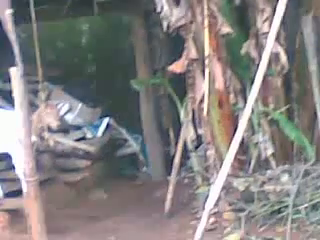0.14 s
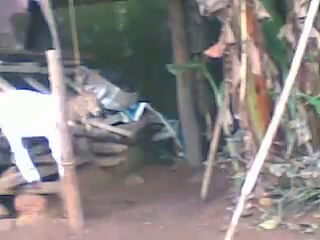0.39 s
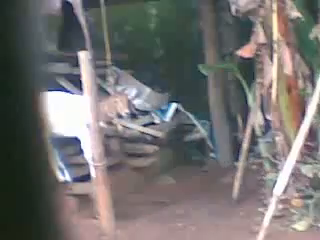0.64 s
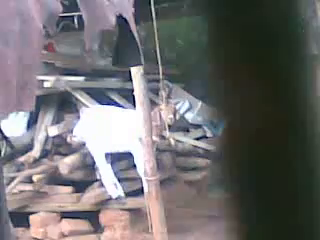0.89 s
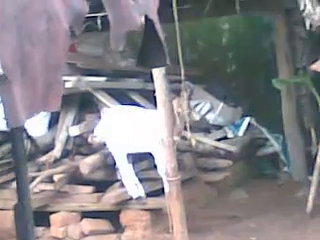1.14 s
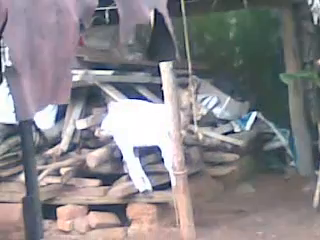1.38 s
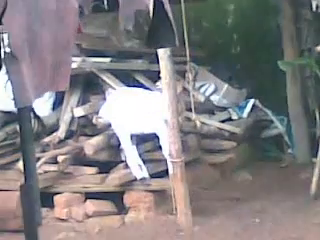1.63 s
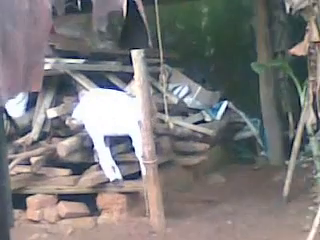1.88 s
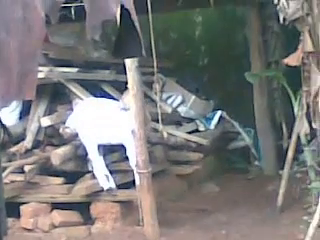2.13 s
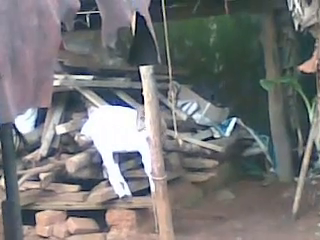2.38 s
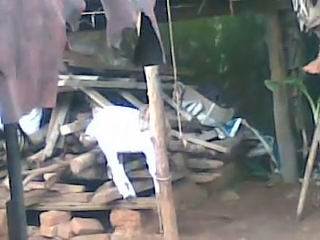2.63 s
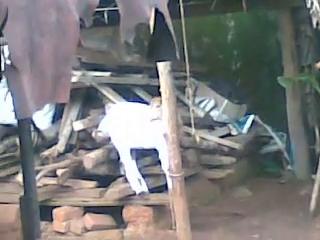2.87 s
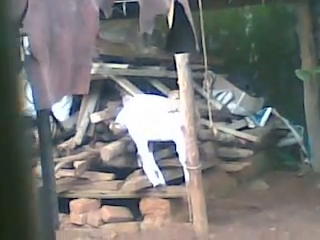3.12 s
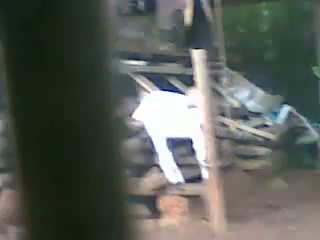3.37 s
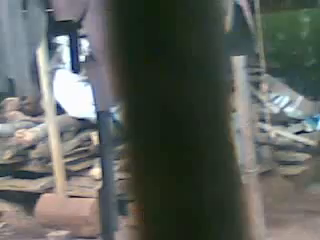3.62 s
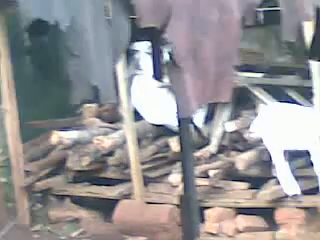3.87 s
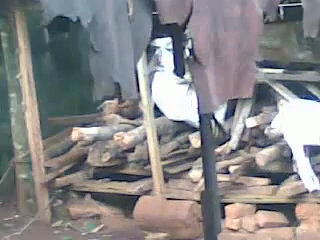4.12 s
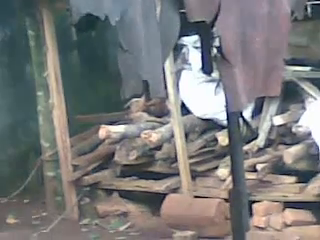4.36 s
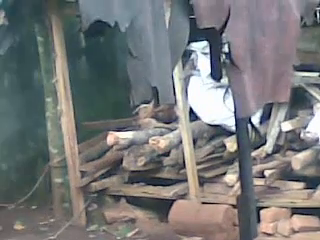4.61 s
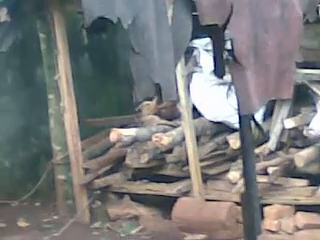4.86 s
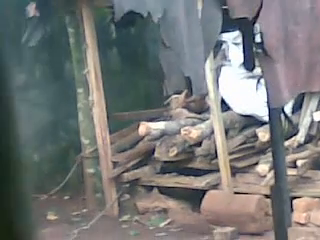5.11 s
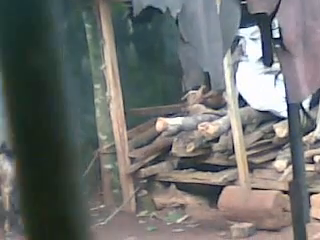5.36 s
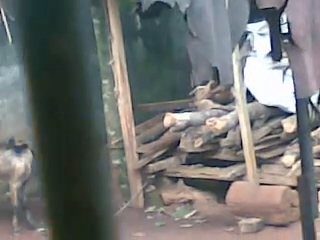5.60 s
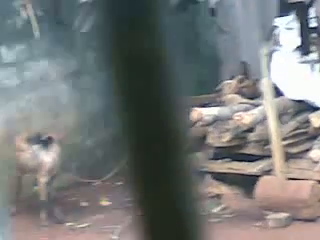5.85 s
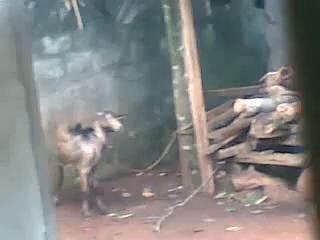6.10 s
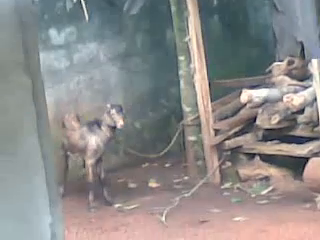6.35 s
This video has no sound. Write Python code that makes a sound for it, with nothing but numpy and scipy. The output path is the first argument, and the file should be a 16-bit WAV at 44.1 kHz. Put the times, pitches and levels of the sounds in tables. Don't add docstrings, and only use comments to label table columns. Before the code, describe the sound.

Three hoarse goat cries come early, echoing briefly off yard walls. Insect hiss swells softly, a low engine passes, then another goat gives a voiced, trembling bleat before the first rasps twice again, the last weak. A hoof scuffs dirt and wind puffs the microphone at the end. Faint distant goat calls, traffic rumble and thin camera noise lie underneath.

```python
import sys
import numpy as np
from scipy import signal
from scipy.io import wavfile
from scipy.ndimage import uniform_filter1d

SR = 44100
rng = np.random.default_rng(int(sys.argv[2]) if len(sys.argv) > 2 else 0)


def gain_from_db(level_db):
    decades = np.asarray(level_db, float) / 20
    return 10 ** decades


def master(y):
    cut = np.clip(np.atleast_2d(y).T, -1, 1)
    pcm = np.round(cut * 32767)
    wavfile.write(sys.argv[1], SR, pcm.astype(np.int16))


N = 281799

# (start [s], length [s], effort [dB], mouth opening [dB])
BLEAT_SYLLABLES = [
    (4.127, 0.11, -40, -13.5),
    (4.215, 0.0853, -27.5, 2),
    (4.313, 0.0656, -26, 4.5),
    (4.398, 0.081, -26.5, 5),
    (4.498, 0.0795, -26, 3.5),
]


def evened(x):
    return x / np.sqrt(np.mean(x ** 2) + 1e-20)


def read(points, hz):
    f, value = np.transpose(points)
    return np.interp(np.log(hz + 1), np.log(f + 1), value)


def columns(rows):
    s, *cols = np.transpose(rows)
    t = np.arange(s[0], s[-1], 1 / SR)
    return [t] + [np.interp(t, s, c) for c in cols]


def add(mix, s, sound):
    part = mix[round(s * SR):][:len(sound)]
    part += sound[:len(part)]


def resonate(x, hz, width_hz):
    turn = np.exp(2j * np.pi * np.cumsum(hz * np.ones(len(x))) / SR)
    r = np.exp(-np.pi * width_hz / SR)
    return 2 * (turn * signal.lfilter([(1 - r) ** 2], [1, -2 * r, r * r], x / turn)).real


def tract(x, modes):
    return evened(sum((-1) ** k * gain_from_db(db) * resonate(x, f, w) for k, (f, w, db) in enumerate(modes)))


def noise(spectrum, size, patchy_db):
    frames, hz = 4 * N // size + 5, np.fft.rfftfreq(size, 1 / SR)
    a, b, patches = rng.standard_normal((frames, len(hz), 3)).T
    patches = uniform_filter1d(patches, size=10, axis=0)
    patches = evened(uniform_filter1d(patches, size=10, axis=1))
    z = (a + 1j * b) * gain_from_db(read(spectrum, hz)[:, None] + patchy_db * patches)
    return evened(signal.istft(z, nperseg=size, noverlap=3 * size // 4)[1][:N])


def traffic():
    # (time [s], level [dB])
    wash_level = [(0.0, -49), (.9, -54), (1.8, -56.5), (2.5, -52.5), (3.3, -50), (3.85, -46.5),
                  (4.6, -49.5), (5.5, -55), (6.39, -47.5)]
    # (frequency [Hz], density [dB per Hz])
    rumble_spectrum = [(8.8, -43), (15, -6.5), (92, 12.5), (140, -1), (156, -40), (200, -6.5), (260, -7),
                       (440, -120)]
    # (frequency [Hz], density [dB per Hz])
    wash_spectrum = [(71, -55), (120, -0.5), (232, -5.5), (350, -5.5), (437, -6), (501, -10), (1130, -12),
                     (1290, -9.5), (3200, -22.5), (4160, -40.5), (7040, -120)]
    # (time [s], firing rate [Hz], level [dB])
    engine = [(3.05, 70.4, -55), (3.2, 66.68, -48), (3.45, 71.3, -50.5), (3.55, 68.7, -44.5),
              (3.85, 68.4, -49.5), (4.1, 68.21, -51.5), (4.35, 66, -54)]
    # (multiple of firing rate [1], level [dB])
    engine_orders = [(1, 4), (1.5, -4.5), (2, -22), (2.5, -12), (3, -14), (5, -12.5)]
    rumble_db, rumble_follows = -50, 0.196
    gust_s, gust_db, gust_rise_s, gust_fall_s = 6.338, -34, .04, .04

    clip_t = np.arange(N) / SR
    wash_db = np.interp(clip_t, *np.transpose(wash_level))
    rumble_db = rumble_db + rumble_follows * (wash_db - wash_db.mean())
    out = gain_from_db(rumble_db) * noise(rumble_spectrum, size=4096, patchy_db=-1.5)
    out = out + gain_from_db(wash_db + 1.5) * noise(wash_spectrum, size=1024, patchy_db=1.0)

    t, hz, level_db = columns(engine)
    turns = np.cumsum(hz) / SR
    drone = sum(gain_from_db(db) * np.sin(2 * np.pi * (k * turns + rng.random())) for k, db in engine_orders)
    add(out, t[0], np.sqrt(2) * gain_from_db(level_db) * drone * signal.windows.tukey(len(t), .15))

    late_s = clip_t - gust_s
    puff = np.exp(np.where(late_s < 0, late_s / gust_rise_s, -late_s / gust_fall_s))
    gust = puff * resonate(rng.standard_normal(N), 90, 60)
    return out + gain_from_db(gust_db) * np.sqrt(np.mean(puff ** 2)) * evened(gust)


def camera_noise():
    # (time [s], level [dB])
    gain = [(0.0, -60.5), (0.85, -59.5), (1.15, -64), (2.15, -64.5), (2.55, -61.5), (4.4, -60),
            (5.1, -63.5), (5.7, -63.5), (6.39, -60.5)]
    # (frequency [Hz], level [dB])
    whine = [(3515, -72), (3806, -84), (4689, -68.5), (4980, -94), (5276, -71), (5566, -59.5),
             (5857, -78.5), (6153, -70), (6444, -71.5), (6740, -69), (7327, -71), (7617, -69.5),
             (7908, -71.5), (8204, -86), (8495, -69.5), (8791, -81), (9238, -77), (11719, -74)]
    # (frequency [Hz], density [dB per Hz])
    hiss_spectrum = [(880, -45), (1500, -3), (1820, -2), (2520, -6), (3760, -4.5), (4570, -0.5),
                     (5240, -2.5), (5400, -1), (5830, -3.5), (7600, -5), (7980, -7.5), (14500, -4.5),
                     (15500, -5)]
    whine_hz, hiss_db = 292.97, -47.5

    t = np.arange(N) / SR
    s, db = np.transpose(gain)
    gain_db = np.interp(t, s, db) - np.interp(3.3, s, db)
    buzz = 0
    for f, level_db in whine:
        multiple_hz = round(f / whine_hz) * whine_hz
        buzz = buzz + gain_from_db(level_db) * np.sin(2 * np.pi * (multiple_hz * t + rng.random()))
    hiss = gain_from_db(hiss_db - 1.72) * noise(hiss_spectrum, size=512, patchy_db=0.68)
    return gain_from_db(gain_db) * (hiss + np.sqrt(2) * buzz)


def far_call(start_s, length_s, peak_db, hz):
    edge_db = -9
    t = np.arange(0, length_s, 1 / SR)
    level_db = peak_db + edge_db * (2 * t / length_s - 1) ** 2
    breath, flutter = rng.standard_normal((SR, 2))[:len(t)].T
    flutter = gain_from_db(2.5 * evened(uniform_filter1d(flutter, size=500)))
    call = evened(resonate(breath * flutter, hz, 370))
    return start_s, gain_from_db(level_db) * call * signal.windows.tukey(len(t), .1)


def rasp(start_s, swell_s, peak_db, gape, gape_at):
    # (frequency [Hz], width [Hz], level [dB])
    upper_modes = [(4676, 433, 3), (5780, 607, 7), (6886, 1980, 3), (10800, 2300, -8.5)]
    # (frequency [Hz], width [Hz], level [dB])
    nose_modes = [(687, 114, 5), (887.2, 424, 9), (1606, 152, 12.5)]
    swell_share, release_s, release_db = .3, .07, -16
    first_db, late_gape_db = -38, -28
    gape_share, gape_effort_db = 0.16, -2.5
    surge_db, surge_s = 1, .03
    throat_hz, gape_hz, effort_hz = 3000, 600, 400
    low_hz, low_db, low_gape_db = 2333, -31, 32
    bright_db, bright_gape_db, bright_release_db, bright_start_db = -9, 4.5, 4, -5.5
    nose_db, nose_gape_db, nose_start_db, wide_cry_nose_db = -18, -17, 6, -6

    t = np.arange(0, swell_s + release_s, 1 / SR)
    grown = 1 - np.exp(-t / (swell_share * swell_s))
    letting_go = np.maximum(t - swell_s, 0) / release_s
    mouth = gape * np.exp(-((t / swell_s - gape_at) / gape_share) ** 2)
    surge_db = surge_db * gape * np.exp(-((t - swell_s) / surge_s) ** 2)
    first_db = first_db + late_gape_db * (gape_at - .5)
    effort_db = first_db + (peak_db - first_db) * grown
    effort_db = effort_db + gape_effort_db * mouth + surge_db + release_db * letting_go
    hz = throat_hz + effort_hz * grown + gape_hz * mouth
    low_db = low_db + low_gape_db * mouth
    bright_db = bright_db + bright_gape_db * mouth + bright_release_db * letting_go
    bright_db = bright_db + bright_start_db * (1 - grown)
    nose_db = nose_db + nose_gape_db * mouth + wide_cry_nose_db * gape + nose_start_db * (1 - grown)

    wobble = rng.standard_normal(SR)[:len(t)]
    size = rng.exponential(1, SR)[:len(t)]
    breath = rng.standard_normal(SR)[:len(t)]
    drive_share = gain_from_db(np.minimum(effort_db + 27, 3))
    slaps_per_s = np.maximum(800 * drive_share, 170)
    unevenness = np.abs(1 + 8 * drive_share ** .5 * uniform_filter1d(wobble, size=60))
    turns = np.cumsum(slaps_per_s * unevenness) / SR + .7
    slaps = np.diff(np.floor(turns), prepend=0) * gain_from_db(3.0 * np.minimum(size, 4)) / np.sqrt(slaps_per_s)
    drive = evened(slaps * np.sign(breath)) + (.35 + .5 * drive_share) * breath
    drive = drive / np.sqrt(uniform_filter1d(drive ** 2, size=3000))

    cry = evened(resonate(drive, hz, 1380) + 0.044 * resonate(drive, hz * 1.243, 310))
    cry = cry + gain_from_db(low_db) * evened(resonate(resonate(drive, low_hz, 780), low_hz, 780))
    cry = cry + gain_from_db(bright_db) * tract(drive + 0.866 * wobble, upper_modes)
    hollow = signal.butter(4, 1600, "high", fs=SR, output="sos")
    cry = signal.sosfilt(hollow, cry)
    cry = cry + gain_from_db(np.minimum(nose_db, -14)) * tract(drive, nose_modes)
    return start_s, gain_from_db(effort_db - 5.0) * cry * signal.windows.tukey(len(t), .02)


def yard(x, tail_db):
    # (frequency [Hz], t60 [s])
    decay = [(300, 0.065), (900, 0.47), (2200, 0.56), (2900, 0.41), (3550, 0.44), (4500, 0.28),
             (6000, 0.29), (12000, 0.14)]
    # (delay [s], level [dB])
    walls = [(.032, -9), (.11, -13)]
    taps = np.zeros(SR)
    at = np.arange(200, SR - 20, 20)
    taps[at + rng.integers(0, 20, len(at))] = rng.choice([-1., 1.], len(at))
    hz, t, z = signal.stft(taps, SR, nperseg=256)
    tail = signal.istft(z * gain_from_db(-60 * t / read(decay, hz)[:, None]), SR, nperseg=256)[1]
    tail = gain_from_db(tail_db) * tail / np.linalg.norm(tail)
    tail[0] += 1
    for s, db in walls:
        tail[round(s * SR)] += gain_from_db(db)
    return signal.fftconvolve(x, tail)[:N]


def insects():
    # (time [s], level [dB])
    chorus = [(1.9, -70.5), (2.35, -62.5), (2.6, -47), (3.05, -72), (4.1, -43.5), (4.22, -36.5)]
    t, level_db = columns(chorus)
    hiss = evened(resonate(rng.standard_normal(len(t)), 4454, 500))
    return t[0], gain_from_db(level_db - 14.0) * hiss * signal.windows.tukey(len(t), .1)


def syllable(start_s, length_s, peak_db, open_db):
    # (frequency [Hz], width [Hz], level [dB])
    throat_modes = [(406, 200, -51.5), (823, 283, 13)]
    # (frequency [Hz], width [Hz], level [dB])
    mouth_modes = [(1680, 410, -5), (2163, 157, 7), (3060, 1140, -13), (3460, 650, 3), (5800, 2500, -14),
                   (7260, 2470, -20.5)]
    # (frequency [Hz], width [Hz], level [dB])
    puff_modes = [(1013, 265, 11), (1480, 750, -2.5), (2256, 610, 5.5), (3630, 1220, 8), (6100, 2400, -4.5),
                  (10600, 1770, -25)]
    hoarse_db = -2
    first_hz, settled_hz, climb_s = 380, 464, .105
    scoop, scoop_s, sag = .25, .019, .05
    push_s, push_rise_db, push_fall_db = .04, -7, -4.5
    opening_db, lips_s, lips_db = 1.5, .018, -14

    t = np.arange(0, length_s, 1 / SR)
    done = t / length_s
    top_hz = settled_hz - (settled_hz - first_hz) * np.exp(-(start_s - BLEAT_SYLLABLES[0][0]) / climb_s)
    hz = top_hz * (1 - scoop * np.exp(-t / scoop_s) - sag * done ** 6)
    effort_db = peak_db + np.interp(t, [0, push_s, length_s], [push_rise_db, 0, push_fall_db])
    mouth_db = open_db + opening_db * (.5 - done) + lips_db * np.maximum(1 - t / lips_s, 0)
    jitter, air = rng.standard_normal((8000, 2))[:len(t)].T
    turns = np.cumsum(hz * (1 + .06 * uniform_filter1d(jitter, size=100))) / SR
    folds = sum(np.cos(2 * np.pi * k * turns) for k in range(1, 20))
    puffs = (.5 + np.exp(-(turns % 1) / .4)) * air
    mouth = tract(folds, mouth_modes) + gain_from_db(hoarse_db) * tract(puffs, puff_modes)
    voice = tract(folds, throat_modes) + gain_from_db(mouth_db) * mouth
    return start_s, gain_from_db(effort_db) * voice * signal.windows.tukey(len(t), .3)


def stamp():
    # (frequency [Hz], width [Hz], level [dB])
    dirt_modes = [(330, 250, 0), (520, 200, 0), (1350, 500, -3)]
    start_s, level_db, t60_s, rise_s = 5.455, -47, .25, .008
    t = np.arange(0, t60_s, 1 / SR)
    scuff = tract(rng.standard_normal(len(t)), dirt_modes)
    return start_s, gain_from_db(level_db - 60 * t / t60_s) * np.minimum(t / rise_s, 1) * scuff


def scene():
    # (start [s], length [s], level [dB], resonance [Hz])
    far_calls = [
        (0.0, 0.087, -48.5, 1630),
        (0.502, 0.21, -51, 1500),
        (1.061, 0.27, -52, 1596),
        (5.753, 0.537, -49, 1670),
        (6.292, .12, -46, 1524),
    ]
    # (start [s], swell length [s], peak effort [dB], gape [0-1], widest at [share of swell])
    rasps = [
        (0.036, .415, -23, 0.27, 0.73),
        (0.628, 0.38, -23.5, 1.0, 0.73),
        (1.273, 0.41, -27, 0.95, 0.76),
        (4.649, 0.36, -23.5, .45, .62),
        (5.262, .37, -30.5, .3, 0.555),
    ]
    far, hoarse, bleat = np.zeros((3, N))
    for row in far_calls:
        add(far, *far_call(*row))
    for row in rasps:
        add(hoarse, *rasp(*row))
    add(far, *insects())
    for row in BLEAT_SYLLABLES:
        add(bleat, *syllable(*row))
    mix = traffic() + camera_noise() + far + yard(hoarse, tail_db=1.5) + yard(bleat, tail_db=-7.5)
    add(mix, *stamp())
    return mix[None]


def starved(x):
    hz, t, z = signal.stft(x, SR, nperseg=1024)
    power = abs(z) ** 2
    patch = uniform_filter1d(uniform_filter1d(power, size=4, axis=0), size=4, axis=1)
    hiss = uniform_filter1d(power[(hz > 13000) & (hz < 15500)].mean(0), size=30)
    loud_db = 10 * np.log10(uniform_filter1d(power.sum(0), size=16) + 1e-12)
    limit_db = np.interp(loud_db, [-50, -30], [-4.6, -1.3])
    limit_db = limit_db + np.interp(hz, [4000, 7000, 12000], [-40, -2, 0])[:, None]
    sunk = 1. * (patch < hiss * gain_from_db(2 * limit_db))
    keep = uniform_filter1d(sunk, size=3, axis=1) == 0
    return signal.istft(z * np.maximum(keep, .02), SR, nperseg=1024)[1][:N]


def low_pass(x):
    return signal.sosfilt(signal.butter(12, 15720, fs=SR, output="sos"), x)


def record(dry):
    limited = .55 * np.tanh(dry[0] / .55)
    mix = starved(limited)[None]
    return low_pass(mix)


dry = scene()
out = record(dry)
master(out)
```